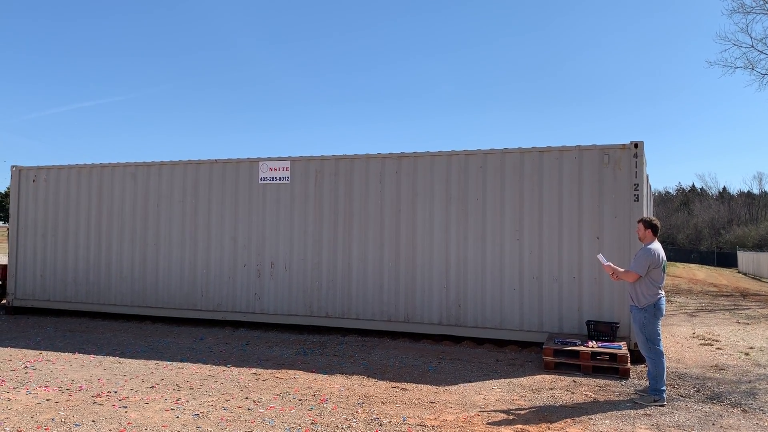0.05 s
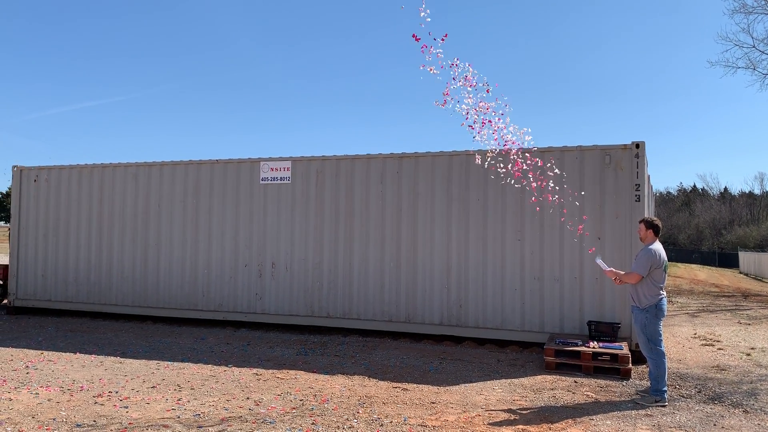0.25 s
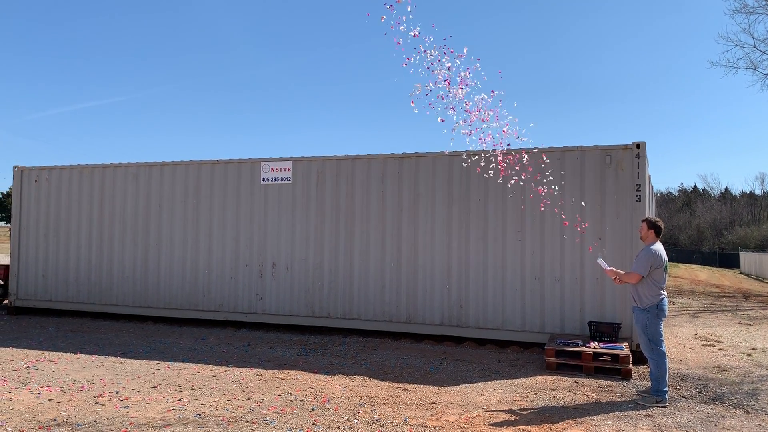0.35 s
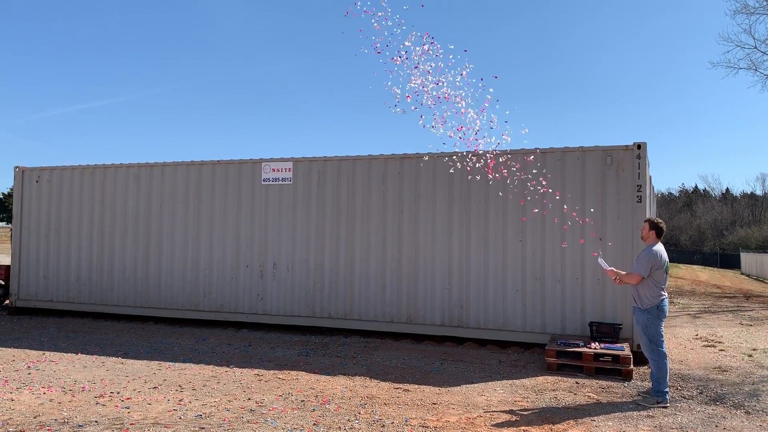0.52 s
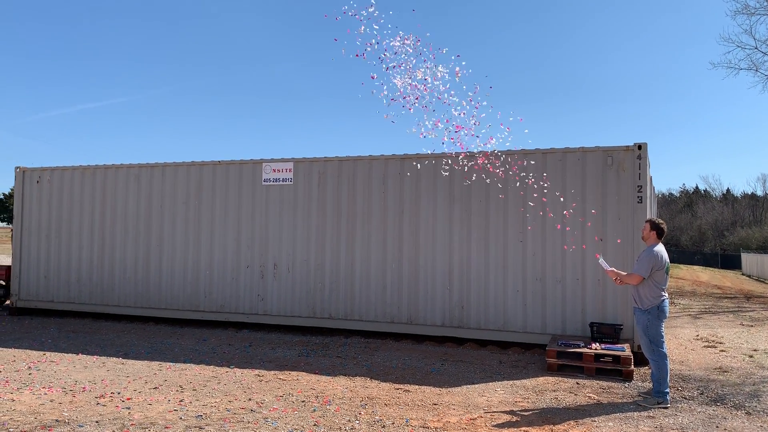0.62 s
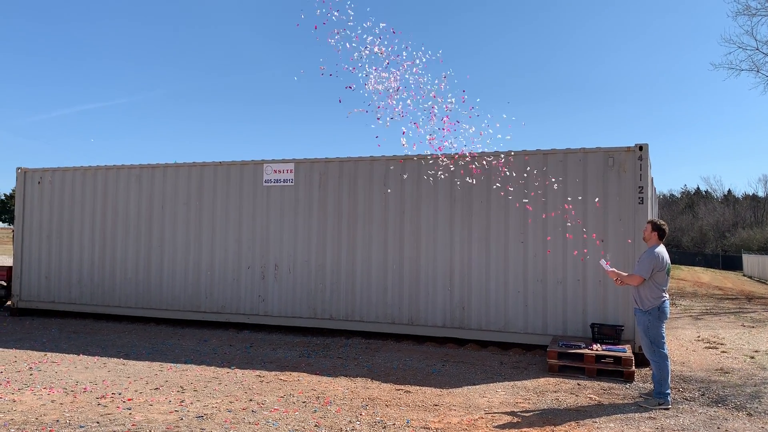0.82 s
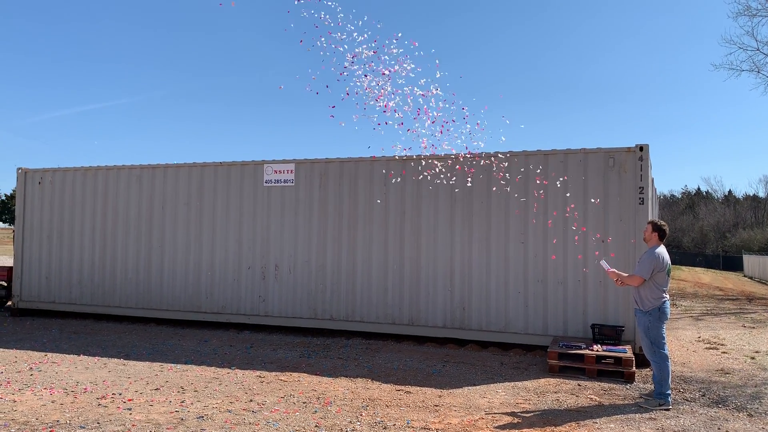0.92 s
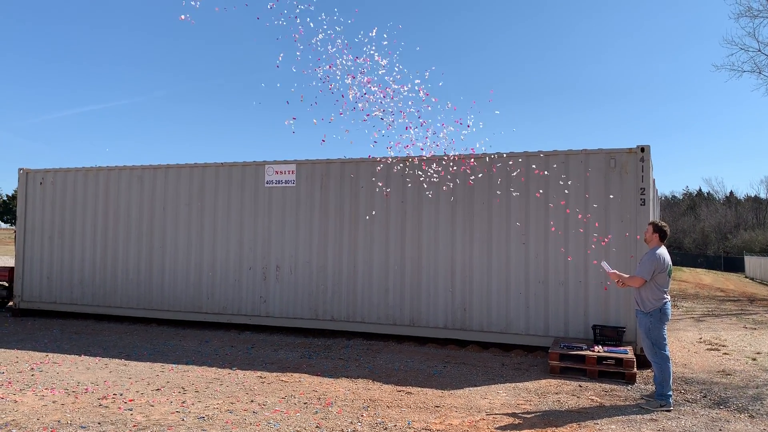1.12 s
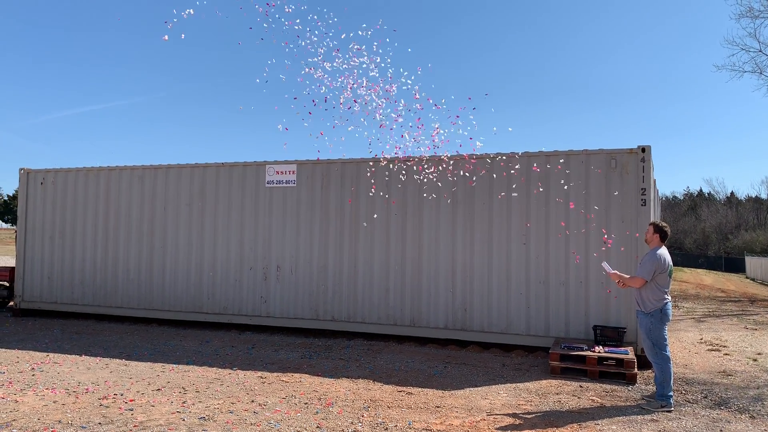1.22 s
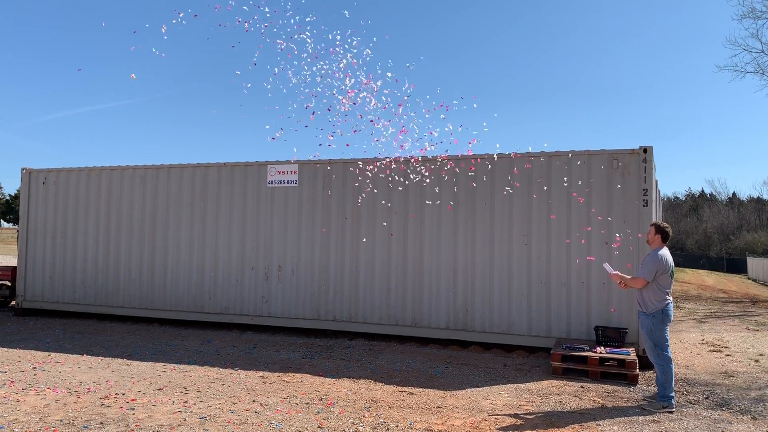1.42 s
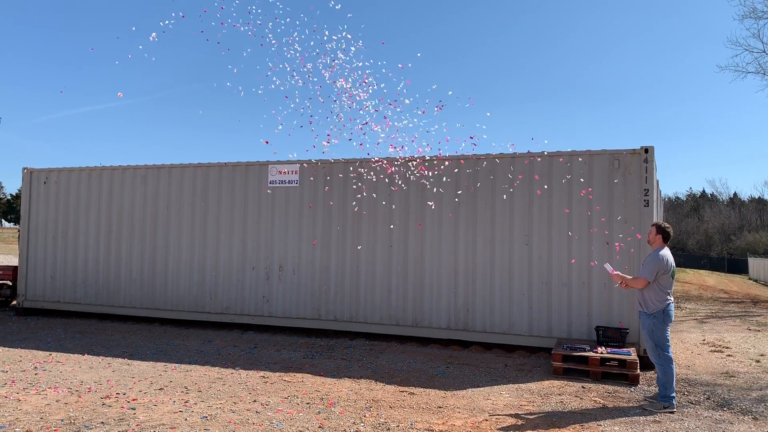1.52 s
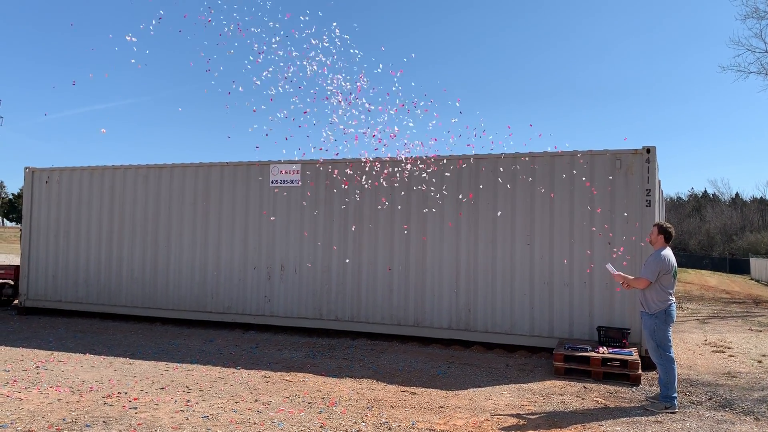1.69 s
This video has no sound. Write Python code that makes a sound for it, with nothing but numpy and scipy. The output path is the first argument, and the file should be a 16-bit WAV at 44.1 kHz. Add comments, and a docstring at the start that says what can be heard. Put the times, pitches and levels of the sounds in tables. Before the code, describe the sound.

A confetti cannon fires with one sharp pop outdoors, echoing briefly over light wind.

```python
"""A brief hiss breaks into a sharp pop: a handheld confetti cannon fires in a gravel yard.
The seal tears, the air column rings, and gas and paper rush out with a falling whistle.
A ribbed steel container reflects the bang as slaps and falling chirps. A knock follows, and the bang
dies away with a few far echoes, two faint clacks and a faint distant hum near the end.
Light wind rumbles throughout."""
import sys
import numpy as np
from scipy import signal
from scipy.fft import rfft, irfft
from scipy.io import wavfile
from scipy.ndimage import uniform_filter1d

SR = 44100
rng = np.random.default_rng(int(sys.argv[2]) if len(sys.argv) > 2 else 0)


def materialize(psi):
    """Save the field psi as 16-bit PCM at rate SR to the path in sys.argv[1].

    A 1-D psi becomes a single channel; in a 2-D psi each row is a channel.
    """
    bounded = np.clip(np.atleast_2d(psi).T, -1, 1)
    quanta = np.round(bounded * 32767).astype(np.int16)
    wavfile.write(sys.argv[1], SR, quanta)


N = 77175
T = np.arange(N) / SR
HZ = np.maximum(np.fft.rfftfreq(N, 1 / SR), 1)
AIR_CUT_HZ = 9500


# Each row: start in seconds, level in dB, hold and t60 in seconds, bass and treble cuts in Hz, pan in dB.
SEAL_BLASTS = [(0.2114, -17, 0.0036, .014, 250, 3000, -3), (0.2156, -9, 0.0042, .009, 300, 14000, -2),
               (0.2318, -9, 0.002, .016, 720, 15000, 4)]
# Each row: frequency in Hz, relative level in dB.
BLAST_SPECTRUM = [(100, -14.5), (300, -13), (550, -8), (800, -4), (1100, 2.5), (1550, -3.5), (2400, -2),
                  (3400, -5), (5000, -11.5), (7200, -19), (9200, -9.5), (11500, -23.5), (15000, -16.5)]
# Each row: frequency in Hz, level in dB, rise, hold and t60 in seconds, pan in dB.
TUBE_MODES = [(547, -11, 0.0033, .002, 0.008, 5), (1053, -10.5, 0.00088, 0.0062, .012, -7)]

def pop(ring_start_s=.2114, lag_s=.00012):
    """Impulsive excitation: the seal yields in turbulent blasts; the first sets the air column ringing."""
    out = 0
    for s, db, hold, t60, low_hz, cut_hz, pan_db in SEAL_BLASTS:
        spectrum = dulled(BLAST_SPECTRUM, cut_hz) / np.sqrt(1 + (low_hz / HZ) ** 6)
        puff = evened(noise(spectrum, .69, lag_s), .0036)
        out += panned(db, pan_db) * puff * envelope(s, .00012, hold, t60)
    age = T - ring_start_s - np.array([[lag_s], [0]])
    for hz, db, rise, hold, t60, pan_db in TUBE_MODES:
        out += panned(db, pan_db) * envelope(ring_start_s, rise, hold, t60) * np.sin(2 * np.pi * hz * age)
    return out


# Each row: time in seconds, level in dB.
JET_LEVEL = [(0.215, -26.5), (0.229, -25), (0.236, -17.5), (0.243, -20.5), (0.252, -23.5), (0.265, -18.5),
             (0.275, -22), (0.285, -33.5), (0.34, -63.5)]
# Each row: frequency in Hz, relative level in dB.
JET_SPECTRUM = [(100, -10), (300, 4), (480, -7.5), (900, 3), (2000, -5), (3500, -6.5), (5200, -12),
                (9000, -17), (11500, -25.5), (15000, -27.5)]
# Each row: time in seconds, pitch in Hz, level in dB.
WHISTLE_GLIDE = [(0.231, 1125, -51.5), (0.236, 1039, -21), (0.246, 910, -15.5), (0.256, 831, -12.5),
                 (0.262, 772, -17.5), (0.272, 690, -32.5)]

def rush():
    """Jet noise: the seal leaks, then gas and paper stream out as the emptying tube's whistle sinks."""
    jet_db, = in_time(JET_LEVEL)
    jet = noise(from_db(over_hz(JET_SPECTRUM)), .55) * flutter(depth_db=4, rate_hz=2100)
    jet *= panned(jet_db, .5) * during(JET_LEVEL)
    leak = noise(dulled(JET_SPECTRUM, cut_hz=5000), .7)
    leak *= panned(-25.5, -9.5) * envelope(.2028, .004, .008, .04)
    hz, whistle_db = in_time(WHISTLE_GLIDE)
    whistle = wavering_tone(hz, rough=.39, width_hz=120)
    whistle += from_db(-13) * wavering_tone(4 * hz, rough=.4, width_hz=120)
    return leak + jet + whistle * from_db(whistle_db) * during(WHISTLE_GLIDE)


def off_ground(x, delay_s=.001609):
    """Interference: the direct sound adds to its weaker, delayed reflection from the gravel."""
    return x + from_db(-13.5) * np.array([np.interp(T - delay_s, T, side) for side in x])


# Each row: start in seconds, level in dB, hold and t60 in seconds, treble cut in Hz.
WALL_SLAPS = [(0.2760, -20.5, .0022, .012, 7000), (0.2838, -11.5, .0035, .026, 10000),
              (0.2910, -17, .003, .03, 13000), (0.2975, -14, .002, .04, 12000),
              (0.307, -18, .009, .065, 10000), (0.348, -29, .006, .08, 8000), (0.364, -26, .006, .08, 8000)]
# Each row: frequency in Hz, relative level in dB.
WALL_SPECTRUM = [(100, -10.5), (170, 4.5), (220, -11.5), (480, -7.5), (900, 3), (1500, 0), (2000, -6.5),
                 (3000, -5), (5000, -8.5), (7200, -16.5), (9500, -11.5), (15000, -39.5)]

def wall_slaps():
    """Reflection: the steel wall returns the bang as short bursts of noise."""
    out = 0
    for s, db, hold, t60, cut_hz in WALL_SLAPS:
        slap = evened(noise(dulled(WALL_SPECTRUM, cut_hz), .5), .022)
        out += from_db(db) * envelope(s, .0006, hold, t60) * slap
    return out * flutter(depth_db=-.5, rate_hz=4500)


# Each row: start in seconds, level in dB, first and final pitch in Hz, glide and t60 in seconds.
RIB_GLIDES = [(0.286, -15.5, 1800, 880, 0.015, 0.21), (0.354, -27.5, 1774, 835, .014, 0.14)]

def rib_chirps():
    """Periodic scattering: echoes from rib after rib arrive ever further apart, so the pitch falls."""
    out = 0
    for s, db, start_hz, end_hz, glide, t60 in RIB_GLIDES:
        hz = end_hz + (start_hz - end_hz) * np.exp(-np.maximum(T - s, 0) / glide)
        chirp = wavering_tone(hz, rough=.65, width_hz=170)
        chirp += from_db(-10.5) * wavering_tone(2 * hz, rough=1.2, width_hz=250)
        out += from_db(db) * envelope(s, .0078, 0, t60) * chirp
    return out


# Each row: start in seconds, relative level in dB, t60 in seconds, ring frequency in Hz, pan in dB.
CONTACTS = [(0.4318, -7.5, .004, 2500, 1), (0.4328, -11.5, .011, 540, 0), (0.4330, -13.5, .007, 1000, 0),
            (0.4362, -13, .005, 2300, 1), (0.4765, -19, .003, 3300, 1)]

def knocks(lag_s=-.00022):
    """Damped vibration: each contact, perhaps the cap landing, rings briefly with a snap of grit."""
    out = 0
    for s, db, t60, hz, pan_db in CONTACTS:
        age = np.maximum(T - s - np.array([[lag_s], [0]]), 0)
        swell = 1 - np.exp(-2 * hz * age)
        ring = np.sin(2 * np.pi * hz * age) * swell * np.exp(-np.log(1000) * age / t60)
        grit = noise(softened(band(hz, q=1)), .13, lag_s) * envelope(s, .000073, 0, .015)
        out += panned(db, pan_db) * (2 * ring + from_db(-8) * grit)
    return out


# Each row: frequency in Hz, left-right coherence of the open air from 0 to 1.
COHERENCE = [(60, .97), (200, .92), (500, .55), (1000, .25), (2500, .05), (10000, .1)]
# Each row: band centre in Hz, level in dB, t60 in seconds.
TAIL_BANDS = [(191.7, -44.5, 1), (407, -39.5, 1), (875, -24, 0.74), (1570, -30, 0.69), (3100, -26.5, 0.64),
              (5500, -33, 0.36), (9050, -39, 0.41)]
# Each row: frequency in Hz, relative level in dB.
ROLL_SPECTRUM = [(200, -6.5), (800, 4.5), (1600, 1.5), (3400, -15), (5000, -30), (7000, -39.5),
                 (15000, -65.5)]
# Far echoes, and a faint distant hum near the end.
# Each row: start in seconds, level in dB, rise and t60 in seconds, band centre in Hz, Q.
TAIL_SWELLS = [(0.395, -37, 0.035, 0.42, 2800, .9), (0.672, -49, .012, .07, 3450, 3),
               (0.695, -39.5, 0.012, .12, 2000, 1), (0.700, -56.5, 0.014, 0.35, 4500, 1.5),
               (0.748, -30, 0.003, 0.035, 837, 1.4), (0.762, -41, 0.004, 0.6, 810, 1.2),
               (0.825, -52, 0.012, 0.3, 3200, 1.6), (0.825, -69.5, 0.008, 0.21, 9700, 3),
               (1.57, -42, .06, .9, 820, 5)]

def yard(start_s=.284):
    """Reverberation: a diffuse tail loses treble first, amid a long roll, far echoes and a late hum."""
    alike = over_hz(COHERENCE)
    tail = swells = 0
    for hz, db, t60 in TAIL_BANDS:
        diffuse = noise(softened(band(hz, q=.83, order=4)), alike)
        tail += from_db(db) * envelope(start_s, .02, 0, t60) * diffuse
    roll = from_db(-44) * envelope(start_s, .45, .052, 2.2) * noise(from_db(over_hz(ROLL_SPECTRUM)), alike)
    for s, db, rise, t60, hz, q in TAIL_SWELLS:
        swells += from_db(db) * envelope(s, rise, 0, t60) * noise(band(hz, q, order=4), alike)
    return (tail + roll) * flutter(depth_db=1.6, rate_hz=34) + swells


# Each row: start in seconds, level in dB.
TOUCHES = [(0.9998, -49.5), (1.073, -63)]
# Each row: frequency in Hz, relative level in dB, t60 in seconds.
CLACK_RESONANCES = [(1840, 5.5, 0.18), (2860, -5, 0.25), (3740, 1.5, 0.2), (4400, -3, 0.18),
                    (5160, -8, 0.11), (6100, -17, 0.32), (8300, -19, 0.19)]

def clacks():
    """Resonance: something light is touched twice and rings briefly in narrow treble bands."""
    out = 0
    for hz, mode_db, t60 in CLACK_RESONANCES:
        ring = evened(noise(band(hz, q=7.8), .079), .0063)
        for s, db in TOUCHES:
            out += from_db(db + mode_db) * envelope(s, .0005, 0, t60) * ring
    return out


# Each row: frequency in Hz, relative level in dB.
WASH_SPECTRUM = [(120, -15), (200, -6.5), (300, -5.5), (380, -7), (550, -9), (860, -6), (1250, -12.5),
                 (1780, -21.5), (2420, -26), (3200, -35), (4200, -42.5), (5860, -58), (15000, -62)]
# Each row: frequency in Hz, relative level in dB.
WIND_SPECTRUM = [(15, -5), (30, -29), (42, 2.5), (58, -1.5), (80, 0.5), (115, -6), (160, -7.5),
                 (230, -15.5), (400, -44), (1500, -95)]
# Each row: time in seconds, level in dB.
GUSTS = [(0, -32.5), (0.42, -35.5), (0.65, -32), (0.9, -34), (1.25, -35), (1.46, -30), (1.75, -35)]

def wind():
    """Turbulence: low buffeting swells and eases over a steady distant wash."""
    alike = over_hz(COHERENCE)
    gust_db, = in_time(GUSTS)
    wash = noise(from_db(over_hz(WASH_SPECTRUM)) / np.sqrt(1 + (170 / HZ) ** 4), alike)
    buffeting = evened(noise(from_db(over_hz(WIND_SPECTRUM)), alike), .33)
    return (from_db(gust_db) * buffeting + from_db(-41) * wash) * panned(0, -1.2)


def from_db(db):
    """Decibels to gain."""
    return 10 ** (np.asarray(db) / 20)


def panned(db, pan_db):
    """Stereo gains for a level and a pan, the left level minus the right."""
    return from_db(db + pan_db * np.array([[.5], [-.5]]))


def envelope(s, attack, hold, t60):
    """Linear rise from time s, hold, then exponential decay of 60 dB in t60 seconds."""
    decay = np.exp(-np.log(1000) * np.maximum(T - s - attack - hold, 0) / t60)
    return np.clip((T - s) / attack, 0, 1) * decay


def in_time(rows):
    """Each column of a curve, interpolated at every sample."""
    s, *columns = np.transpose(rows)
    return [np.interp(T, s, c) for c in columns]


def during(rows):
    """A gate open between a curve's first and last times."""
    return (T > rows[0][0]) * (T < rows[-1][0])


def over_hz(points):
    """Interpolation on a log-frequency axis."""
    hz, value = np.transpose(points)
    return np.interp(np.log(HZ), np.log(hz), value)


def band(hz, q, order=2):
    """Band-pass gain around hz."""
    return (1 + (q * (HZ / hz - hz / HZ)) ** 2) ** (-order / 2)


def dulled(spectrum, cut_hz):
    """Gain of a spectrum table under a second-order low-pass."""
    return from_db(over_hz(spectrum)) / np.sqrt(1 + (HZ / cut_hz) ** 4)


def softened(gain):
    """A fourth-order low-pass on the highest treble."""
    return gain / np.sqrt(1 + (HZ / AIR_CUT_HZ) ** 8)


def noise(gain, coherence, lag_s=0):
    """Partly coherent stereo noise of rms 1; the shared part reaches the left lag_s later."""
    shared, left, right = rfft(rng.standard_normal((3, N)))
    common = np.sqrt(coherence) * np.array([shared * np.exp(-2j * np.pi * HZ * lag_s), shared])
    separate = np.sqrt(1 - coherence) * np.array([left, right])
    x = irfft((common + separate) * gain, N)
    return x / np.sqrt(np.mean(x ** 2) + 1e-20)


def evened(x, span_s):
    """Division by the running rms gives even a short burst a definite strength."""
    power = uniform_filter1d(np.mean(x ** 2, axis=0), max(int(span_s * SR), 8))
    return x / np.sqrt(power + 1e-9)


def flutter(depth_db, rate_hz):
    """Random amplitude modulation: the level flickers."""
    return from_db(depth_db * noise(1 / (1 + (HZ / rate_hz) ** 2), .44))


def wavering_tone(hz, rough, width_hz):
    """Narrow-band modulation: a gliding tone wanders in strength and phase."""
    phase = 2 * np.pi * np.cumsum(hz) / SR
    slow = 1 / (1 + (HZ / width_hz) ** 2)
    in_phase = (1 + rough * noise(slow, .5)) * np.sin(phase)
    quadrature = rough * noise(slow, .5) * np.cos(phase)
    return (in_phase + quadrature) / np.sqrt(.5 + rough ** 2)


def scene():
    """Superposition: the shot, its echoes, the contacts and the wind add in the open air."""
    return off_ground(pop() + rush()) + wall_slaps() + rib_chirps() + knocks() + clacks() + yard() + wind()


def record(dry, ceiling=3.7, stop_hz=16700):
    """Soft saturation rounds the peaks; a steep low-pass cuts the top."""
    low_pass = signal.cheby2(14, 70, stop_hz, fs=SR, output="sos")
    return signal.sosfilt(low_pass, ceiling * np.tanh(dry / ceiling))


dry = scene()
out = record(dry)
materialize(out)
```